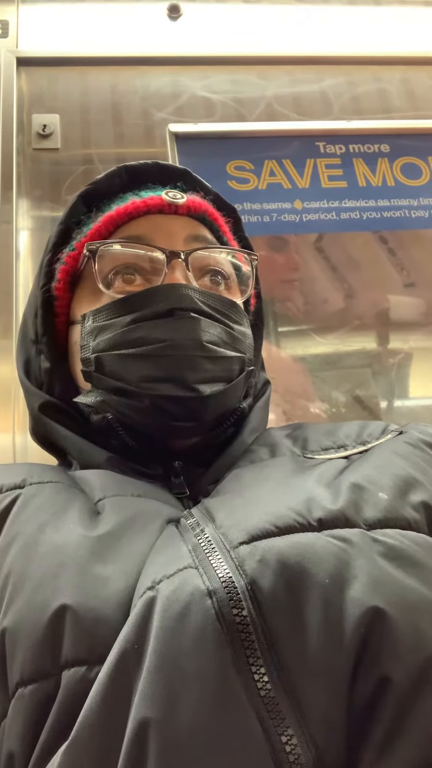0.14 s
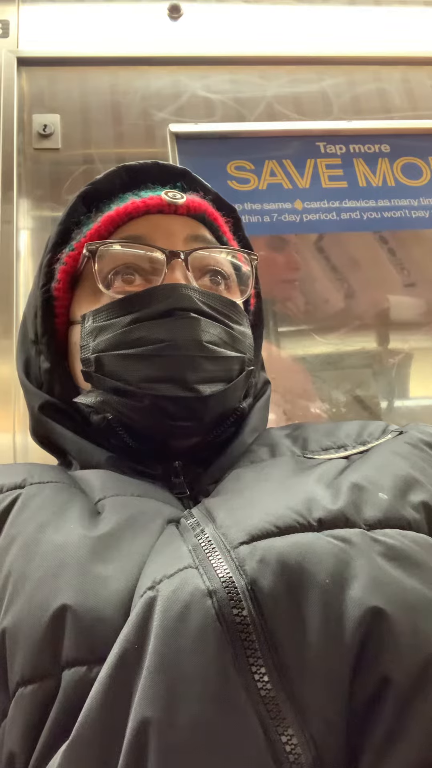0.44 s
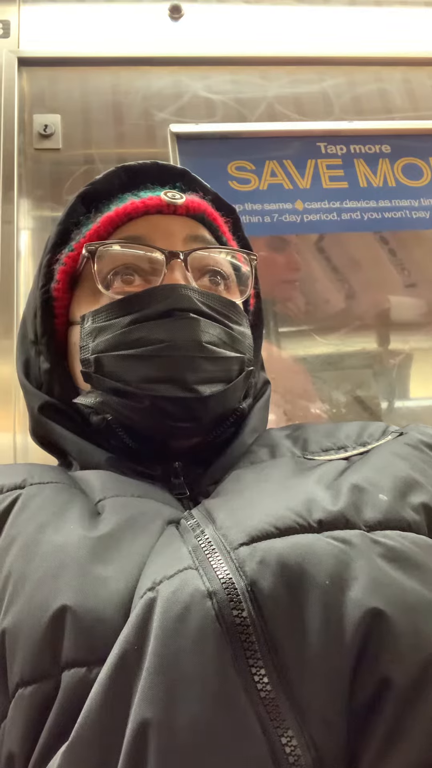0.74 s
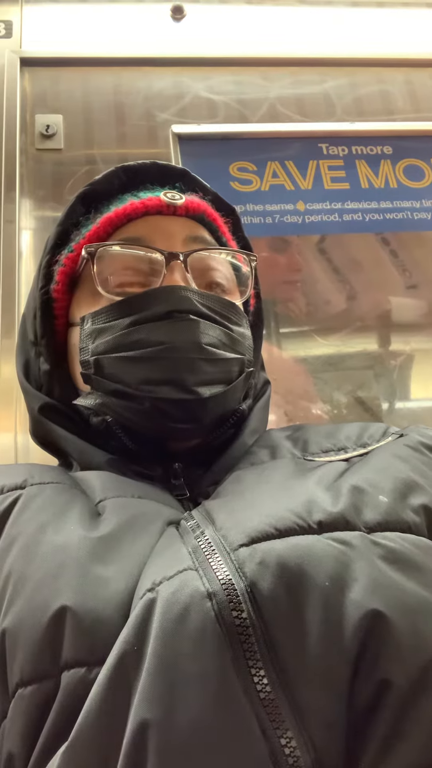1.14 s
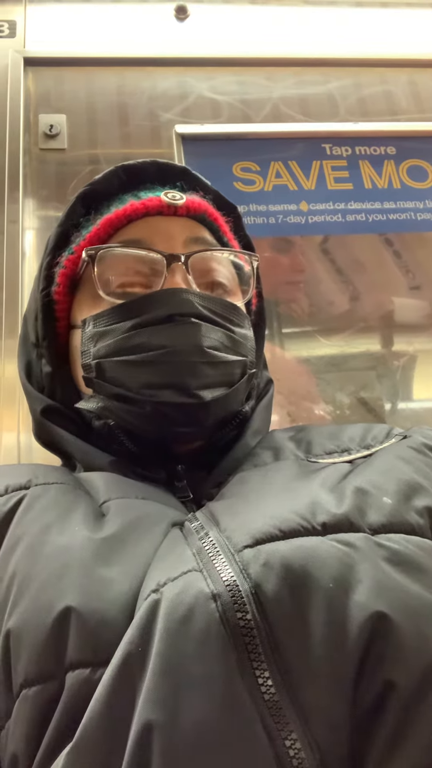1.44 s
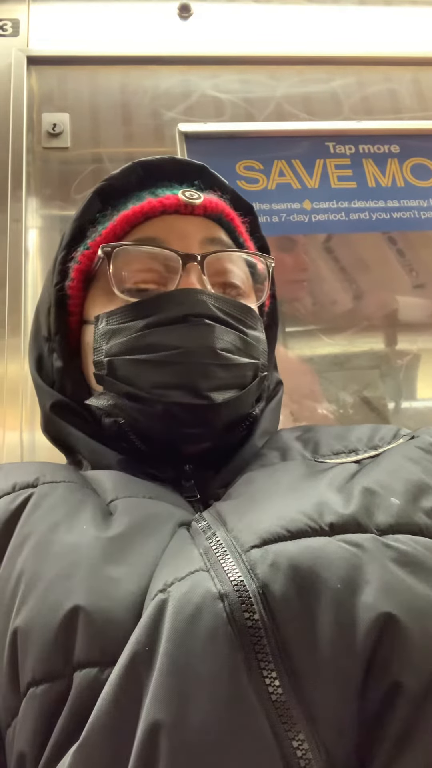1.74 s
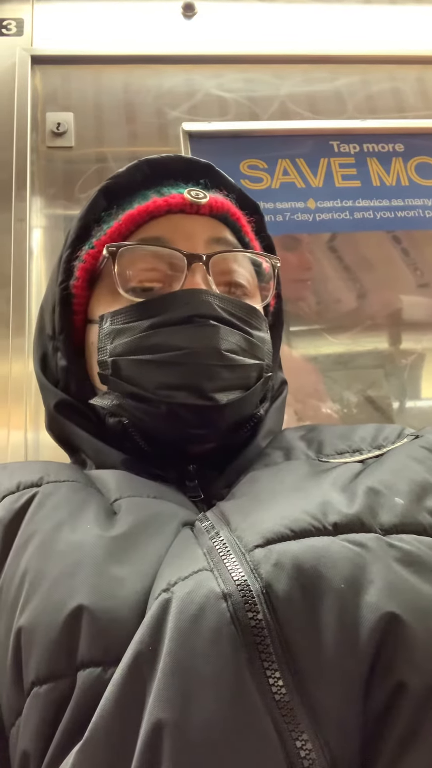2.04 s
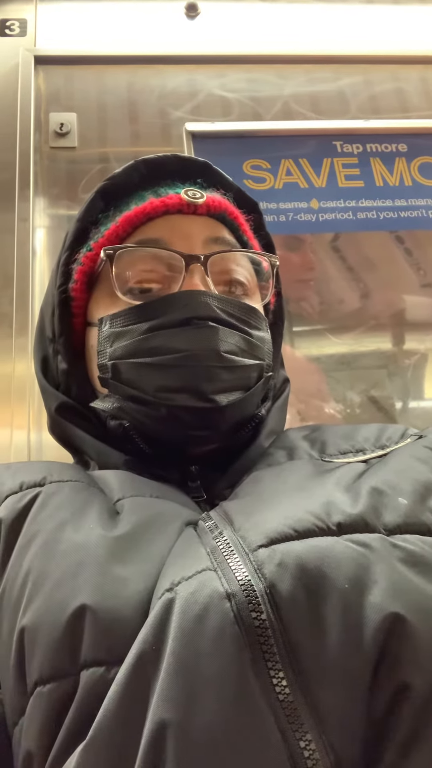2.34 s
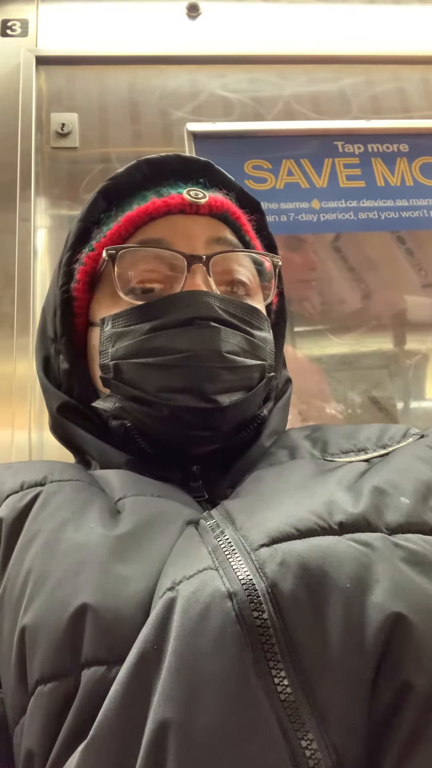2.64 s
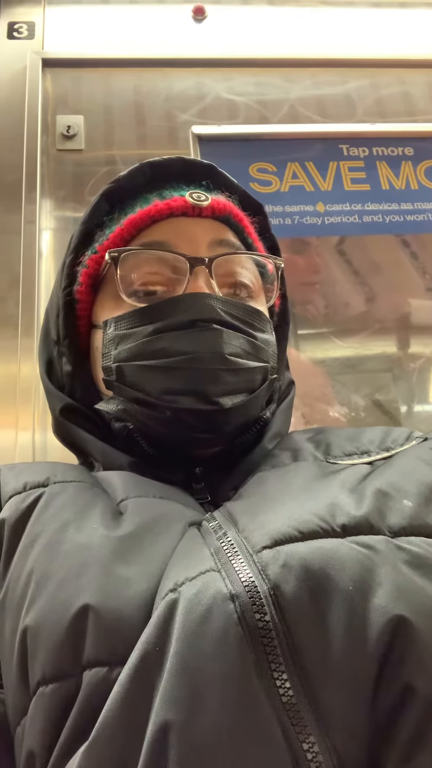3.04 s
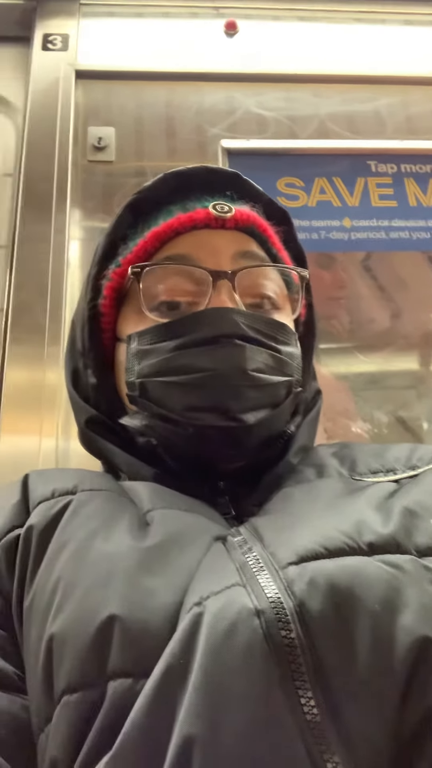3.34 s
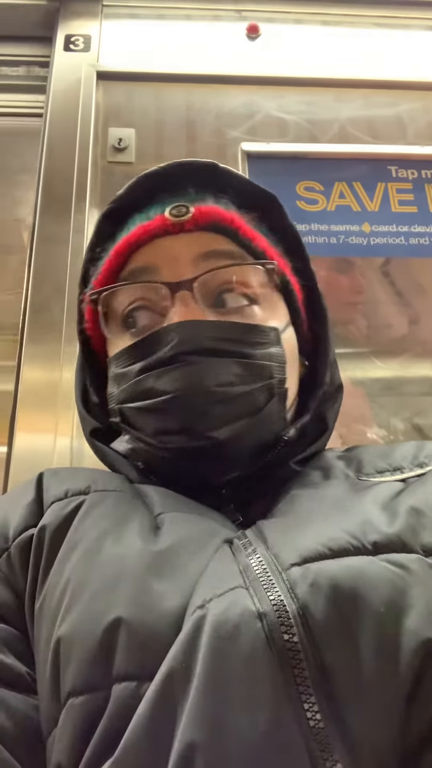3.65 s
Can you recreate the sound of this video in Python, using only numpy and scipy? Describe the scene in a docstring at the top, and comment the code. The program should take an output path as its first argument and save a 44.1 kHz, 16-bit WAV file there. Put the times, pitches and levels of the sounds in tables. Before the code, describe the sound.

Subway ride from inside: steady rumble and faint squeals, then an abrupt booming roar of air.

```python
"""A pressure wave, probably from a passing train, slams against a moving subway car and leaves a loud roar
that rings in the body; air hisses suddenly just before. Until then wheels rumble, flanges sing faintly,
the drive whines and a fan hums. Roar, air and rolling are shaped noise with moving levels;
low swells, squeals, whine and hum are sines, and two microphone ports hear each source slightly differently."""
import sys
import numpy as np
from scipy import signal
from scipy.fft import rfft, irfft
from scipy.io import wavfile

SR = 44100
rng = np.random.default_rng(int(sys.argv[2]) if len(sys.argv) > 2 else 0)


def put_to_file(sound):
    """Save the sound as 16-bit audio at rate SR, in the file named by the first command-line argument."""
    columns = np.atleast_2d(sound).T  # one column per channel
    safe = np.clip(columns, -1, 1)
    whole_steps = np.round(safe * 32767)
    wavfile.write(sys.argv[1], SR, whole_steps.astype(np.int16))


N = 167580
T = np.arange(N) / SR
HZ = np.fft.rfftfreq(N, 1 / SR)

# phase between the microphone ports, negative = the right leads: (frequency [Hz], lag of the right [rad])
PORT_PHASE = [(60, 0), (250, -0.48), (780, -1.05), (1250, -0.5), (2500, -1.8), (5000, -2.5), (11300, -3),
              (12300, -5.5)]


def passing_train():
    """The pressure wave is heard as a roar, slams of air and brief tonal swells."""
    return roar() + slams() + tonal_swells()


def roar(buffet_db=0.4, bass_edge_hz=142, bass_fade_s=3.55, bass_fade_db_per_s=27):
    """Buffeted noise rings in the car body; its bass fades while the patchy rush above it stays."""
    # roar before its level curve: (frequency [Hz], density [dB per Hz])
    roar_spectrum = [(22, -66), (52, -47.5), (68, -46.5), (95, -38.5), (130, -45.5), (180, -43),
                     (260, -46.5), (340, -47.5), (420, -53.5), (600, -53), (1000, -58), (1500, -63),
                     (2000, -70.5), (2600, -71.5), (4000, -78), (5200, -93.5), (8000, -105.5),
                     (15000, -110)]
    # rise and surges of the roar: (time [s], level [dB])
    roar_level = [(2.93, -19), (3.04, -18), (3.10, -10), (3.13, -4.5), (3.16, 0), (3.24, 3), (3.315, -1.5),
                  (3.355, 0), (3.39, -4), (3.49, 1), (3.56, -4.5), (3.61, -1), (3.67, -1.5), (3.74, -2),
                  (3.785, 2)]
    # resonances of the car body: (frequency [Hz], width [Hz], level above the roar [dB])
    body_modes = [(221.2, 22, 4), (280, 17, 3.5), (337.5, 22, 3.5), (447, 14, -2), (627, 39, -1.5),
                  (680, 12, 2), (982, 59, -1.5), (1980, 20, 7.5)]
    level_db = np.interp(T, *np.transpose(roar_level), left=-100)
    colour = read(roar_spectrum) + peaks(body_modes) + standing_waves()

    # split into bass and rush at the bass edge
    slope = ((HZ + 1) / bass_edge_hz) ** 8
    bass = noise(colour - 10 * np.log10(1 + slope))
    bass = bass * amp(-bass_fade_db_per_s * np.maximum(T - bass_fade_s, 0))
    rush = noise(colour - 10 * np.log10(1 + 1 / slope))
    rush = patchy(rush, depth_db=1.83, rate_hz=18)
    return (bass + rush) * amp(level_db + buffet_db * drift(35))


def slams():
    """Air slams on the wall and rattles it: noise in quick bursts."""
    # slams of air: (start [s], rise [s], decay [s], level over the rattle [dB])
    slam_times = [(3.119, 0.0074, 0.021, -2), (3.143, 0.0081, 0.11, -2), (3.335, 0.026, 0.07, -10)]
    # rattle of the wall: (frequency [Hz], density before the slam levels [dB per Hz])
    rattle_spectrum = [(100, -58), (350, -47.5), (650, -43.5), (1000, -56.5), (1900, -61), (3300, -64.5),
                       (5000, -73), (8000, -80), (15000, -104)]
    return bursts(slam_times) * noise(read(rattle_spectrum))


def tonal_swells():
    """Low, brief tonal swells in the roar: sines under bell-shaped swells."""
    # tonal swells: (middle [s], half length [s], frequency [Hz], level at the middle [dB])
    swells = [(3.103, 0.016, 105, -22), (3.188, 0.022, 84.8, -12.5), (3.228, 0.012, 200, -21),
              (3.242, 0.017, 104, -16.5), (3.293, 0.013, 98, -20.5), (3.332, 0.038, 273.5, -21),
              (3.355, 0.0054, 234.1, -14), (3.41, 0.015, 104.8, -20), (3.438, 0.011, 82.1, -16.5),
              (3.475, 0.021, 222.8, -21), (3.567, 0.0088, 99.7, -17), (3.628, 0.052, 220.6, -21)]
    out = 0
    for middle, half, hz, db in swells:
        bell = np.exp(-.5 * ((T - middle) / half) ** 2)
        out = out + tone(np.full(N, hz), db, 0) * bell
    return out


def air(start_s=2.9, rise_s=0.023, hold_db=-3.5, flutter_db=1.3, draught_rise_s=.05):
    """Air spurts over a fluttering hiss; a deeper draught swells behind it."""
    # rush of air before the hold level: (frequency [Hz], density [dB per Hz])
    hiss_spectrum = [(40, -87), (400, -81), (1100, -73), (2500, -83), (4300, -75), (6200, -79.5),
                     (9500, -91), (12500, -88), (15500, -94)]
    # draught before its standing waves: (frequency [Hz], density [dB per Hz])
    draught_spectrum = [(40, -68), (100, -57.5), (200, -56.5), (330, -65), (600, -67), (1100, -67),
                        (1700, -73), (3000, -86), (8000, -115)]
    # spurts of air: (start [s], rise [s], decay [s], level relative to the steady hiss [dB])
    spurts = [(2.908, 0.014, 0.015, 3), (2.935, .012, 0.041, 2.5), (3.025, .015, 0.029, -5),
              (3.19, 0.025, 0.023, -5), (3.315, 0.0086, 0.015, 0.5), (3.335, 0.016, 0.023, 1.5)]
    flow = np.clip((T - start_s) / rise_s, 0, 1) + bursts(spurts)
    hiss = noise(read(hiss_spectrum)) * flow * amp(hold_db + flutter_db * drift(18))
    draught = noise(read(draught_spectrum) + standing_waves())
    return hiss + draught * np.clip((T - start_s) / draught_rise_s, 0, 1)


def rolling():
    """Wheels on the rail: a steady rumble, jolts, scuffs and a thin hiss."""
    return rumble() + jolts() + scuffs_and_hiss()


def rumble(swell_db=.25, flutter_db=.5):
    """Rolling noise excites the cabin's resonances and wavers in level."""
    # rolling noise before the cabin colours it: (frequency [Hz], density [dB per Hz])
    rolling_spectrum = [(18, -76), (28, -69.5), (40, -65.5), (52, -52), (76, -55), (96, -67), (140, -57.5),
                        (175, -64), (330, -63.5), (500, -67), (760, -67.5), (920, -71.5), (1400, -73),
                        (1900, -78), (2400, -80.5), (3500, -86), (4400, -88.5), (5200, -100.5),
                        (5850, -89.5), (6300, -99), (9000, -105), (10200, -114), (12500, -119),
                        (15500, -127)]
    # resonances of the cabin: (frequency [Hz], width [Hz], level above the rolling noise [dB])
    cabin_modes = [(267.7, 19, 6), (664, 36, -3.5), (801, 31, 1.5), (1095, 14, 2), (1187, 33, 4.5),
                   (1345, 40, 5), (1424, 62, 4), (1930, 94, 3)]
    out = noise(read(rolling_spectrum) + peaks(cabin_modes) + standing_waves())
    out = out * amp(swell_db * drift(1.8) + flutter_db * drift(21))
    return patchy(out, depth_db=1.3, rate_hz=12)


def jolts():
    """Jolts of the track thud through the car: low noise under smooth arches."""
    # jolts of the track: (start [s], length [s], level over the thud [dB])
    jolt_times = [(1.25, 0.3, -3.5), (1.66, 0.098, -1)]
    # thud before the jolt levels: (frequency [Hz], density [dB per Hz])
    thud_spectrum = [(25, -75), (45, -52), (80, -35), (130, -78), (250, -93), (2000, -140)]
    return noise(read(thud_spectrum)) * sum(amp(db) * arch(s, length) for s, length, db in jolt_times)


def scuffs_and_hiss(grain_db=2.0):
    """Bands of noise, scuffs and a thin hiss under the squeals, share one grainy level."""
    # scuffs, and a narrow hiss at 4420 Hz: (start [s], length [s], centre [Hz], half width [octaves],
    # density [dB per Hz], skew [under 1 = quick attack])
    bands = [(0.92, 0.11, 2800, 0.52, -78.5, 0.44), (1.85, 0.15, 1400, 0.65, -72, 0.66),
             (2.30, 0.066, 4000, 0.84, -87, 0.32), (0.82, 1.6, 7400, 0.5, -101, 0.32),
             (.5, .3, 4420, .04, -78, .9), (1.6, 0.32, 12000, .25, -110, 1.2)]
    grain = amp(grain_db * drift(160))
    out = 0
    for s, length, hz, octaves, db, skew in bands:
        distance = np.log2((HZ + 1) / hz) / octaves
        band = noise(db - 10 * np.log10(1 + distance ** 8))
        out = out + band * arch(s, length, skew) * grain
    return out


def flanges(wander_hz=14, edge_s=0.022, lag=-2.04, chatter_db=3, chatter_hz=90):
    """A wheel mode catches and sings in short stretches, chattering as it sticks and slips."""
    # flange squeals: (start [s], length [s], start pitch [Hz], end pitch [Hz], level before chatter [dB])
    squeals = [(0, .15, 4840, 4800, -57.5), (0, 0.14, 4350, 4240, -55), (.15, .11, 4820, 4700, -61),
               (0.467, .12, 4640, 4510, -58), (0.515, 0.37, 4490, 4455, -61.5),
               (.6, 0.073, 4440, 4450, -50), (.71, .06, 4770, 4830, -60), (0.956, 0.055, 4100, 4180, -53),
               (1.05, 0.13, 4530, 4560, -52), (1.176, 0.095, 4570, 4570, -49.5),
               (1.255, 0.14, 4500, 4620, -57), (1.413, 0.13, 4640, 4650, -64)]
    out = 0
    for s, length, start_hz, end_hz, db in squeals:
        pitch = np.interp(T, [s, s + length], [start_hz, end_hz]) + wander_hz * drift(100)
        level_db = db + chatter_db * drift(chatter_hz)
        out = out + stroke(s, length, edge_s) * tone(pitch, level_db, lag)
    return out


def drive(wander_hz=1.2, waver_db=1.2, shift_s=1.3, shift_length_s=0.27):
    """Thin electrical and motor tones; their balance shifts once, as the tone at 5739 Hz rises."""
    # mean pitch of each tone of the motors and drive: [Hz]
    pitches = [690, 1421, 1821, 2051, 2131, 5286, 5620, 5739, 5858, 5980, 8608, 8969]
    # the same tones: (level before the shift [dB], lag of the right port [rad], change at the shift [dB])
    balance = [(-55, -0.5, 1.5), (-60.5, 2, 0.5), (-58, -1.5, -0.5), (-58.5, -1.5, -2), (-62.5, -2, -2),
               (-76.5, -1, 0.5), (-76.5, 4.5, -1), (-68.5, 2, 8), (-64.5, 1.5, -1), (-62.5, 2.5, -2.5),
               (-67, 4, -3.5), (-65, 3.5, -0.5)]
    shift = np.clip((T - shift_s) / shift_length_s, 0, 1)
    out = 0
    for hz, (db, lag, change_db) in zip(pitches, balance):
        level_db = db + change_db * shift + waver_db * drift(10)
        out = out + tone(hz + wander_hz * drift(12), level_db, lag)
    return out


def fan(shaft_hz=26.95, wander=0.004, smear_hz=1.6, waver_db=1.2):
    """The hum is orders of one nearly steady shaft, each slightly unsteady in pitch and level."""
    # orders of the hum: (multiple of the shaft speed, mean level [dB])
    orders = [(1, -56), (2, -41), (3, -39.5), (4, -38), (5, -47.5), (10, -37), (18, -58)]
    speed = shaft_hz * (1 + wander * drift(9.3))
    out = 0
    for k, db in orders:
        pitch = k * speed + smear_hz * drift(12.5)
        out = out + tone(pitch, db + waver_db * drift(8), read(PORT_PHASE, k * shaft_hz))
    return out


def amp(db):
    """Decibels to gain."""
    return 10 ** (np.asarray(db) / 20)


def read(points, hz=HZ):
    """A table joined by straight lines over log frequency."""
    f, value = np.transpose(points)
    return np.interp(np.log(hz + 1), np.log(f + 1), value)


def drift(rate_hz):
    """Random wander of unit RMS, with little movement faster than the rate."""
    x = irfft(rfft(rng.standard_normal(N)) * np.exp(-(HZ / rate_hz) ** 2) * (HZ > 0), N)
    return x / x.std()


def ports(hz):
    """Left and right gain at each frequency; their mean power stays at one."""
    # balance of the ports: (frequency [Hz], left minus right [dB])
    balance = [(60, 1.7), (150, 1.4), (380, 5.1), (950, 2), (2380, 0.2), (15000, 0.34)]
    lean = amp(read(balance, hz))
    return np.array([lean, np.ones_like(lean)]) * np.sqrt(2 / (1 + lean ** 2))


def noise(density_db):
    """Noise of the given spectrum, partly shared by the two ports and shifted in phase at the right."""
    # likeness of the ports, held between the bass floor and 1: (frequency [Hz], coherence)
    likeness = [(60, 3.5), (130, -0.5), (290, 2), (640, 0.62), (1400, 0.42), (2500, 1), (4500, 0.72),
                (7000, 0.3), (9500, 1.5), (11200, 1), (13000, 3.5)]
    # long waves reach both ports alike: (frequency [Hz], least coherence)
    bass_likeness = [(60, .997), (130, .985), (290, .94), (640, .55), (1500, 0)]
    left, other = rfft(rng.standard_normal((2, N)))
    same = np.clip(read(likeness), read(bass_likeness), 1)
    right = (same * left + np.sqrt(1 - same ** 2) * other) * np.exp(-1j * read(PORT_PHASE))
    return irfft(np.array([left, right]) * ports(HZ) * amp(density_db), N) * np.sqrt(SR / 2)


def tone(hz, level_db, lag):
    """A sine along a pitch curve at an RMS level, as the two ports hear it."""
    phase = 2 * np.pi * np.cumsum(hz) / SR + 2 * np.pi * rng.random()
    return np.sqrt(2) * amp(level_db) * ports(hz.mean())[:, None] * np.sin([phase, phase - lag])


def peaks(table):
    """The lift in dB that resonances give to a spectrum."""
    power = sum(amp(db) ** 2 / (1 + (2 * (HZ - hz) / width) ** 2) ** 2 for hz, width, db in table)
    return 10 * np.log10(1 + power)


def standing_waves(depth_db=2.4, echo_s=0.015):
    """Fine ripple over frequency, in dB, from echoes between the hard walls; weaker in the bass."""
    ripple = rfft(rng.standard_normal(N) * np.exp(-T / echo_s)).real
    return depth_db * ripple / ripple.std() * HZ / (HZ + 400)


def patchy(x, depth_db, rate_hz, count=10):
    """Overlapping bands swell and sink on their own; the lowest one holds steady."""
    place = np.interp(np.log(HZ + 1), np.log([300, 5000]), [0, count - 1])
    spectrum = rfft(x)
    gains = [1] + [amp(depth_db * drift(rate_hz)) for _ in range(count - 1)]
    return sum(irfft(spectrum * np.maximum(1 - abs(place - k), 0), N) * gain for k, gain in enumerate(gains))


def arch(start, length, skew=1):
    """A smooth swell; skew under 1 brings its top forward."""
    return np.sin(np.pi * np.clip((T - start) / length, 0, 1) ** skew)


def bursts(table):
    """The summed envelope of straight rises and exponential decays."""
    out = 0
    for s, rise, decay, db in table:
        fall = np.exp(-np.maximum(T - s - rise, 0) / decay)
        out = out + amp(db) * np.clip((T - s) / rise, 0, 1) * fall
    return out


def stroke(start, length, edge_s):
    """A held envelope with a quick start and stop."""
    return np.clip(np.minimum(T - start, start + length - T) / edge_s, 0, 1)


def scene():
    """Everything heard inside the car."""
    return passing_train() + air() + rolling() + flanges() + drive() + fan()


def record(dry):
    """The recorder's band limit: a steep low-pass at 15850 Hz."""
    lowpass = signal.firwin(511, 15850, window=("kaiser", 9), fs=SR)
    return signal.oaconvolve(dry, lowpass[None], "same")


dry = scene()
out = record(dry)
put_to_file(out)
```